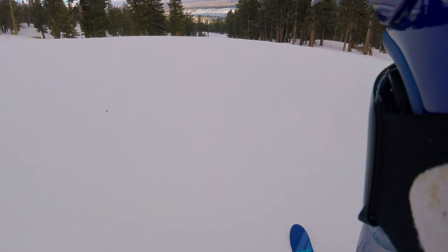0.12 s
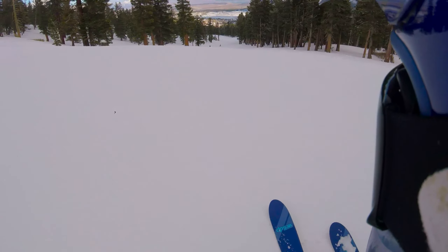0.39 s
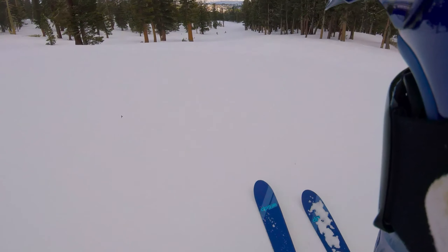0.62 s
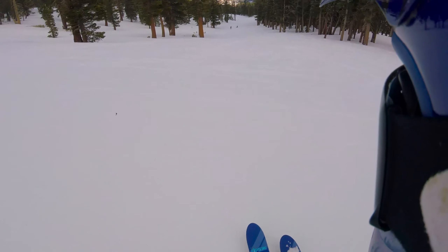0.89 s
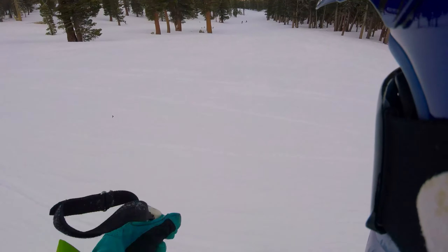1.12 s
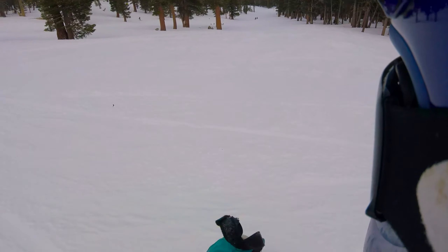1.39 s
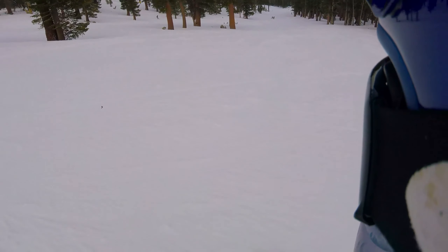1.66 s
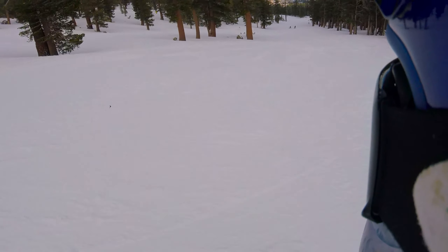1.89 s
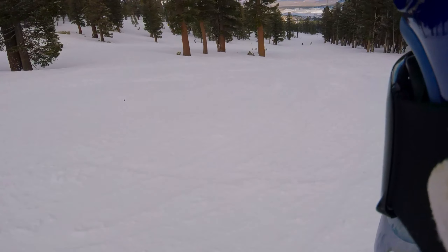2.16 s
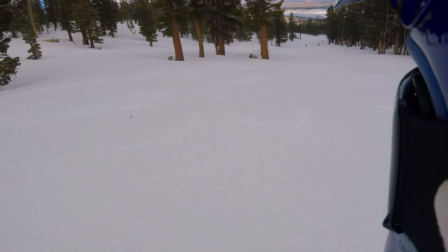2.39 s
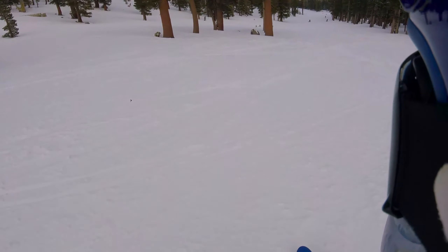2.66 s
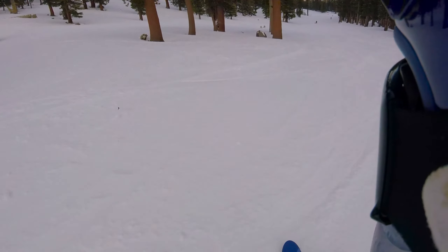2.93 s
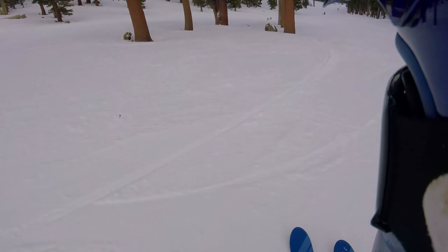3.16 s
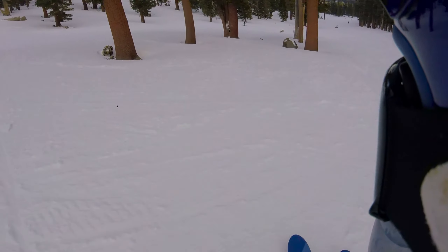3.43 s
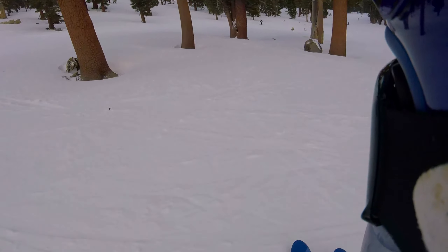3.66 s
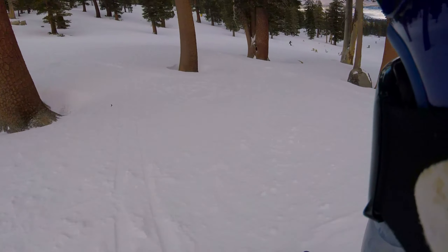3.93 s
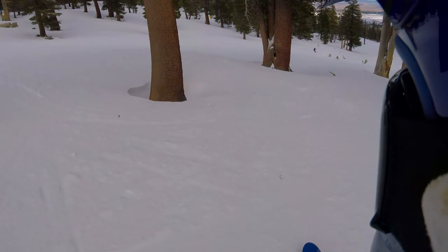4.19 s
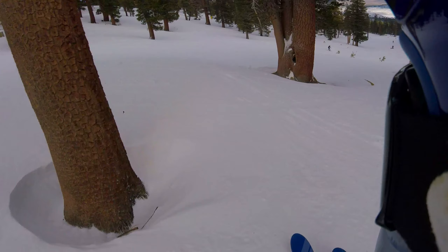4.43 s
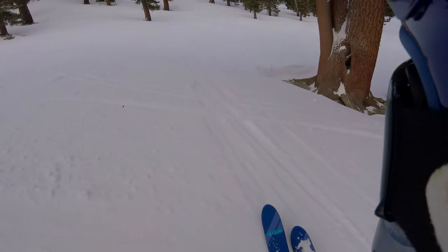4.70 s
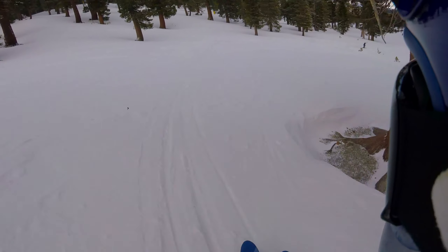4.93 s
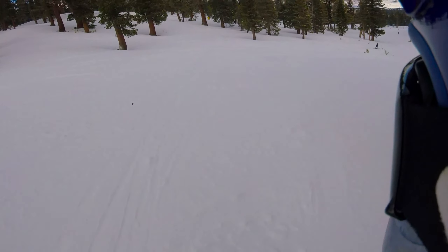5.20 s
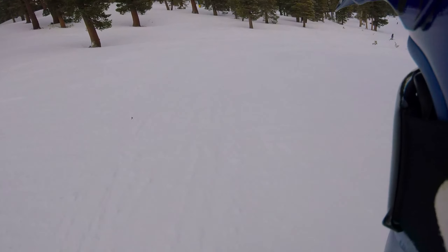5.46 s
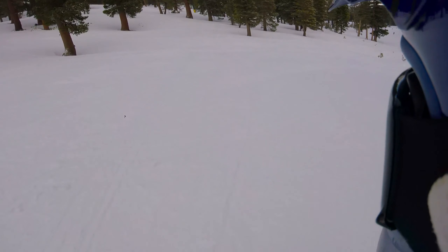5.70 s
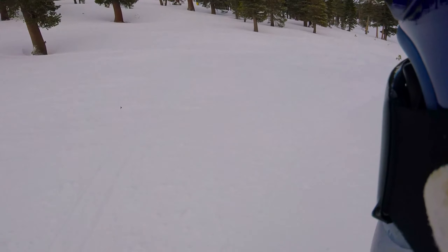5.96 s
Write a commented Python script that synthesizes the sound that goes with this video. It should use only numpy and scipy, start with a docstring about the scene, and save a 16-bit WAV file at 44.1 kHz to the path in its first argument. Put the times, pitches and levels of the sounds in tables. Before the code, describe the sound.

Throughout about six seconds, wind presses on a small helmet-mounted microphone: a dense, steady low rumble with ragged midrange flutter and airy rushing, fullest during the first two seconds. Skis grind softly through snow underneath, a grainy crunch with rapid chatter. Isolated sharp ticks land at about 1.4, 1.6 and 1.8. From 2.1 to 3.4 the rush eases, the edges bite brighter and spray hisses, with frequent snaps of crystals and a thin high airy hiss at its strongest. Around 3.5 to 3.9 low gusts flutter, and dull soft thuds join the ticks. From 4.0 to 4.4 the skis nearly quiet while crystals rattle in a quick cluster. A thud at 4.8 precedes a renewed crunch and scrape at 5.0 to 5.3; then lighter sliding, sparse ticks and a final gusty swell near 5.8 to 6. Dry, close, mono, with evened-out level and open surroundings.

```python
"""Wind is heard first: it buffets and rushes over the microphone port of a small helmet camera as a skier
glides down a powder slope. Turbulent eddies are modelled as filtered noise whose level drifts at random.
The skis crunch (sliding noise mixed with grains of breaking crust) and throw up a hissing spray.
Loose crystals tick on the housing as decaying noise bursts; softer lumps thud as a damped resonance.
Fast gain control evens the level, the bass most of all."""
import sys
import numpy as np
from scipy import signal
from scipy.fft import rfft, irfft, next_fast_len
from scipy.io import wavfile
from scipy.ndimage import uniform_filter1d

SR = 44100
rng = np.random.default_rng(int(sys.argv[2]) if len(sys.argv) > 2 else 0)


def invert_db(x):
    """Field ratio 10**(x/20) for x, a level in decibels (scalar or array-like)."""
    u = np.asarray(x, float) / 20
    return 10 ** u


def log_audio(samples):
    """Write samples as a 16-bit WAV file to the path given in sys.argv[1]."""
    # one column per channel
    frames = np.atleast_2d(samples).T
    # limit to full scale, then quantise
    limited = np.clip(frames, -1, 1)
    pcm = np.round(limited * 32767).astype(np.int16)
    wavfile.write(sys.argv[1], SR, pcm)


N = 268117


def rms_one(x):
    """Normalisation: divides a signal by its root mean square."""
    return x / np.sqrt(np.mean(x ** 2) + 1e-20)


def white():
    """White noise: independent normal samples, equal power at all frequencies, rms 1."""
    return rng.standard_normal(N)


def in_time(rows):
    """Linear interpolation of each table column along the time axis."""
    s, *columns = np.transpose(rows)
    return [np.interp(np.arange(N) / SR, s, column) for column in columns]


def colour(x, spectrum):
    """Minimum-phase filtering: a folded cepstrum gives a causal response; white noise keeps its rms."""
    size = next_fast_len(N + SR)
    hz, db = np.transpose(spectrum)
    log_hz = np.log(np.fft.rfftfreq(size, 1 / SR) + 1)
    log_gain = np.interp(log_hz, np.log(hz), db) * np.log(10) / 20
    cepstrum = irfft(log_gain, size)
    cepstrum[1:size // 2] *= 2
    cepstrum[size // 2 + 1:] = 0
    response = np.exp(rfft(cepstrum))
    response = response / np.sqrt(np.mean(abs(response) ** 2))
    return irfft(rfft(x, size) * response, size)[:N]


def drift(rate_hz):
    """Low-pass random process: noise through two equal real poles at rate_hz; mean 0, spread 1."""
    step, settle = 40, 2000    # samples per slow step; slow steps dropped while the filter settles
    r = np.exp(-2 * np.pi * rate_hz * step / SR)
    noise = rng.standard_normal(N // step + settle + 2)
    slow = signal.lfilter([1], [1, -2 * r, r * r], noise)[settle:]
    return np.interp(np.arange(N) / step, np.arange(len(slow)), rms_one(slow - slow.mean()))


def grains(per_s, spread_db):
    """Shot noise: independent random clicks of uneven size and sign, normalised to rms 1."""
    sizes = invert_db(spread_db * np.minimum(rng.exponential(1, N), 5)) * rng.choice([-1, 1], N)
    return rms_one(sizes * (rng.random(N) < per_s / SR))


def halves(x, corner_hz):
    """Band splitting: zero-phase low-pass and its complement, each at rms 1."""
    low = signal.sosfiltfilt(signal.butter(2, corner_hz, fs=SR, output="sos"), x)
    return rms_one(low), rms_one(x - low)


# pressure spectrum of the large eddies: (frequency [Hz], relative density [dB per Hz])
BUFFET_SPECTRUM = [(11, -48.5), (18, -9), (54, 1), (107, 1), (129, 0.5), (145, -7), (170, -19),
                   (220, -52.5), (370, -120)]


def wind_buffet():
    """Turbulent pressure fluctuation: large eddies thump the port, steady on average."""
    level_db = -19 + 0.5 * drift(1.3) + 0.57 * drift(9.0)
    return invert_db(level_db) * colour(white(), BUFFET_SPECTRUM)


# air over the port: (time [s], flutter of the middle eddies [dB], rush of the small eddies [dB])
WIND_LEVELS = [(0.0, -24, -33.5), (0.03, -36.5, -39), (0.08, -28, -29), (0.12, -33, -33.5),
               (0.25, -31.5, -31.5), (0.3, -18.5, -37.5), (0.36, -37, -32), (0.39, -24.5, -29),
               (0.57, -34.5, -34.5), (0.76, -30.5, -30.5), (0.85, -28, -28.5), (0.91, -34, -28.5),
               (1.0, -17, -31.5), (1.05, -31, -27), (1.1, -28, -28.5), (1.18, -28.5, -27.5),
               (1.26, -29, -29.5), (1.34, -30, -30), (1.45, -37.5, -28.5), (1.49, -23, -37.5),
               (1.57, -33, -27), (1.61, -28, -31.5), (1.66, -34, -29), (1.69, -26, -28.5),
               (1.85, -40, -32.5), (1.88, -32, -28), (1.93, -34, -34), (2.32, -27, -37), (2.34, -37, -36.5),
               (2.44, -32, -36), (3.44, -34.5, -34), (3.47, -26.5, -34.5), (3.54, -23, -35),
               (3.6, -24, -38), (3.64, -31, -32), (3.71, -24, -41.5), (3.77, -27.5, -37), (3.81, -28, -40),
               (3.84, -28.5, -35.5), (3.9, -25.5, -34.5), (3.96, -34.5, -36), (4.0, -30.5, -37),
               (4.1, -29.5, -36), (4.3, -32.5, -38), (4.52, -32, -38), (4.94, -35, -39.5),
               (4.98, -33, -32.5), (5.45, -33.5, -37), (5.72, -30.5, -33.5), (5.76, -22, -31.5),
               (5.79, -32, -34), (5.82, -30.5, -35), (5.89, -27, -32), (5.96, -25.5, -28),
               (5.99, -48, -28.5), (6.05, -30, -28.5), (6.08, -33, -37)]
# spectrum of middle and small eddies: (frequency [Hz], relative density [dB per Hz])
RUSH_SPECTRUM = [(90, -31), (140, -3.5), (175, -4.5), (260, -6), (340, -9.5), (500, -11), (700, -14),
                 (900, -18.5), (1200, -25.5), (1700, -53.5), (2500, -90)]


def wind_rush():
    """Eddy scale sets frequency: middle eddies flutter below the corner, small ones rush above it."""
    flutter_db, rush_db = in_time(WIND_LEVELS)
    eddies = white() * invert_db(1.28 * drift(52.0) + 0.56 * drift(78.0))
    flutter, rush = halves(colour(eddies, RUSH_SPECTRUM), corner_hz=322)
    flutter = invert_db(flutter_db + 0.7 * drift(5.9)) * flutter
    rush = invert_db(rush_db + 0.28 * drift(3.2)) * rush
    return flutter + rush


# thin hiss at the helmet edge, rising with speed: (time [s], level [dB])
SPEED_LEVELS = [(0, -71), (.62, -69.5), (1.2, -70.5), (1.8, -65), (2.83, -61), (3.6, -62.5), (4.2, -67.5),
                (4.77, -68.5), (5.1, -67), (5.55, -69), (6.08, -67.5)]
# spectrum of that hiss: (frequency [Hz], relative density [dB per Hz])
EDGE_HISS_SPECTRUM = [(5500, -34), (7500, -7), (8600, -6.5), (9500, -8), (10300, -11), (11300, -23.5),
                      (12000, -30.5), (13500, -32.5), (15000, -46), (22000, -110)]


def helmet_hiss():
    """Edge noise: air shed at the helmet edge gives a thin high hiss that grows with flow speed."""
    level_db, = in_time(SPEED_LEVELS)
    return invert_db(level_db + 0.4 * drift(15.0)) * colour(white(), EDGE_HISS_SPECTRUM)


def wind():
    """Superposition of the three scales of moving air."""
    return wind_buffet() + wind_rush() + helmet_hiss()


# skis in the snow: (time [s], edge bite [dB], base crunch [dB])
SKI_LEVELS = [(0.0, -42.5, -32), (0.1, -41.5, -34.5), (0.32, -45.5, -35.5), (0.41, -43.5, -31.5),
              (0.64, -48.5, -40), (0.8, -44, -32.5), (0.93, -44, -33.5), (1.05, -44, -35),
              (1.17, -45.5, -35), (1.3, -38.5, -31), (1.61, -41.5, -32.5), (1.62, -38, -30.5),
              (1.68, -41.5, -34.5), (1.79, -40.5, -33.5), (1.81, -44, -37), (2.0, -46, -38),
              (2.06, -43.5, -32), (2.12, -41, -30), (2.2, -37.5, -28), (2.23, -36.5, -36),
              (2.27, -36, -29.5), (2.35, -36.5, -35.5), (2.42, -37, -38), (2.49, -33, -39.5),
              (2.56, -41, -39), (2.79, -33, -34), (2.81, -40.5, -38), (2.89, -34, -40), (2.95, -38, -40),
              (3.3, -41, -37.5), (3.32, -37, -28), (3.35, -37.5, -40), (3.4, -36.5, -34.5),
              (3.57, -42.5, -40), (3.59, -44, -39), (3.61, -43.5, -46), (3.69, -43.5, -33),
              (3.73, -46, -44.5), (3.83, -41.5, -35), (3.84, -42, -40), (3.98, -47, -43), (4.01, -45, -36),
              (4.03, -44, -50), (4.1, -49.5, -46), (4.2, -49, -38), (4.32, -47.5, -59), (4.33, -43.5, -54),
              (4.69, -49, -47.5), (4.82, -47, -39), (4.84, -43, -31.5), (4.89, -42.5, -35),
              (4.96, -48, -36.5), (4.98, -41.5, -37), (5.04, -36.5, -30), (5.13, -37.5, -31),
              (5.19, -39, -38), (5.22, -37.5, -37), (5.27, -39, -38), (5.33, -45, -37), (5.38, -48.5, -46),
              (5.45, -47, -39), (5.59, -47.5, -38), (5.62, -42, -34), (5.69, -45, -30.5), (5.71, -49, -38),
              (5.77, -47.5, -34), (5.84, -48, -45), (5.86, -47, -34), (5.93, -46, -35.5), (6.0, -47.5, -36),
              (6.08, -50, -41)]
# spectrum of the contact, also the knock of ticks: (frequency [Hz], relative density [dB per Hz])
CRUNCH_SPECTRUM = [(400, -49), (650, -4), (850, -1), (1050, 0), (1350, -1.5), (1820, -6), (2400, -13),
                   (3130, -18.5), (4000, -26.5), (4800, -33.5), (6000, -62), (10000, -110)]


def skis():
    """Friction and fracture: smooth sliding noise plus breaking crust, chattering over the bumps."""
    edge_db, base_db = in_time(SKI_LEVELS)
    breaking = np.clip(0.38 + 0.12 * drift(6.1), 0, 1)    # crust's share of the contact power
    chatter_db = 0.91 * drift(37.0) + 0.5 * drift(80.0) + 0.11 * drift(4.7)
    crust = grains(per_s=900, spread_db=2.5)
    contact = np.sqrt(1 - breaking) * white() + np.sqrt(breaking) * crust
    base, edge = halves(colour(contact, CRUNCH_SPECTRUM), corner_hz=1620)
    crunch = invert_db(base_db + 0.52 * drift(21.0)) * base + invert_db(edge_db) * edge
    return invert_db(chatter_db) * crunch + spray(crust, breaking, chatter_db)


# spectrum of flung snow, also the ping of ticks: (frequency [Hz], relative density [dB per Hz])
SPRAY_SPECTRUM = [(2710, -46.5), (4600, -18.5), (4900, -7.5), (5780, 2.5), (6300, 3), (7390, 0),
                  (8600, -10.5), (11200, -42), (18900, -120)]


def spray(crust, breaking, chatter_db):
    """Partial correlation: airborne snow hisses with edge bite and speed, partly in step with the crust."""
    edge_db, _ = in_time(SKI_LEVELS)
    speed_db, = in_time(SPEED_LEVELS)
    by_bite = 0.62 * (edge_db - edge_db.mean())       # dB of spray per dB of bite
    by_speed = 0.26 * (speed_db - speed_db.mean())    # dB of spray per dB of speed hiss
    level_db = -52 + by_bite + by_speed
    flung = 0.15 * breaking    # share of the power that leaves in step with the breaking crust
    thrown = np.sqrt(1 - flung) * white() + np.sqrt(flung) * crust
    # airborne, so less tied to the bumps than the contact is
    return invert_db(level_db + 0.67 * chatter_db + 0.41 * drift(25.0)) * colour(thrown, SPRAY_SPECTRUM)


# crystals on the housing: (time [s], snap [dB], knock [dB], ping [dB], crack [dB])
TICK_LEVELS = [(1.398, -23, -9, -41, -36), (1.6256, -24, -16, -44, -40), (1.826, -35, -21, -44, -45),
               (2.1525, -32, -24, -44, -42), (2.1934, -14, -16, -27, -32), (2.202, -30, -15, -32, -36),
               (2.254, -37, -21, -38, -40), (2.305, -26, -19, -34, -33), (2.3725, -32, -24, -37, -33),
               (2.4844, -23, -28, -29, -40), (2.5418, -18.5, -21, -44, -42), (2.6652, -30, -16, -26, -38),
               (2.715, -29, -14, -28, -35), (2.796, -20, -25, -31, -33), (2.8888, -16, -19, -39, -34),
               (3.043, -25, -19, -37, -39), (3.1606, -31, -20, -37, -38), (3.452, -30, -13, -40, -29),
               (3.5282, -26, -27, -31, -42), (3.5824, -29, -20, -41, -42), (3.6304, -37, -26, -44, -44),
               (3.658, -28, -15, -42, -46), (3.694, -26, -18, -48, -46), (3.763, -27, -22, -39, -44),
               (3.8198, -26, -12.5, -37, -42), (3.991, -35, -17, -52, -54), (4.0098, -31, -20, -47, -47),
               (4.0416, -35, -18, -47, -48), (4.0745, -40, -24, -37, -48), (4.091, -34, -17.5, -35, -31),
               (4.1085, -32, -18, -42, -36), (4.142, -27, -28, -38, -46), (4.15, -28, -16, -40, -31),
               (4.166, -35, -18, -35, -36), (4.1853, -27, -22, -50, -31), (4.193, -34, -21, -50, -43),
               (4.202, -34, -19, -50, -44), (4.209, -37, -22, -46, -44), (4.219, -30, -16, -41, -46),
               (4.226, -34, -28, -46, -34), (4.235, -28, -27, -47, -45), (4.257, -29, -27, -44, -38),
               (4.263, -39, -22, -47, -45), (4.284, -34, -35, -47, -40), (4.292, -31, -25, -50, -50),
               (4.335, -32, -22, -49, -50), (4.3422, -29, -27, -44, -44), (4.411, -23, -18, -41, -33),
               (4.8266, -34, -24, -44, -46), (4.973, -32, -26, -42, -43), (5.0735, -24, -16, -27, -36),
               (5.114, -16.5, -17, -38, -35), (5.2075, -24, -20, -36, -35), (5.306, -29, -20, -40, -38),
               (5.5134, -37, -22, -44, -48), (5.683, -28, -23, -44, -40), (5.8635, -34, -17, -52, -45),
               (6.0028, -26, -17, -46, -47)]
# spectra of snap, crack and bright edge of a ping: (frequency [Hz], relative density [dB per Hz])
SNAP_SPECTRUM = [(1200, -38.5), (2200, 11), (3000, 0.5), (4000, -14), (4800, -23.5), (6000, -35),
                 (9000, -65.5)]
CRACK_SPECTRUM = [(1800, -29.5), (2900, -8), (3600, 5), (4600, -6.5), (5500, -14), (8000, -42),
                  (14000, -74)]
PING_TOP_SPECTRUM = [(7000, -34), (10500, -3), (12500, 1.5), (15000, -7), (17000, -37), (22000, -80)]


def ticks():
    """Impact excitation: each burst drives a dull knock, dry snap, thin crack and port-resonance ping."""
    snap_s, knock_s = 0.00035, 0.0013    # decay time constants; the knock rattles longer
    length = 256                         # samples per burst
    s, snap_db, knock_db, ping_db, crack_db = np.transpose(TICK_LEVELS)
    noise = rng.standard_normal((len(s), length))
    noise[:, 0] = 13 * np.sign(noise[:, 0])    # first contact stands above the rattle that follows
    at = np.round(s * SR).astype(int)[:, None] + np.arange(length)
    parts = [(knock_db, CRUNCH_SPECTRUM, knock_s),
             (snap_db, SNAP_SPECTRUM, snap_s),
             (crack_db, CRACK_SPECTRUM, snap_s),
             (ping_db, SPRAY_SPECTRUM, snap_s),
             (ping_db - 33, PING_TOP_SPECTRUM, snap_s)]
    out = np.zeros(N)
    for level_db, spectrum, decay_s in parts:
        burst = noise * np.exp(-np.arange(length) / (decay_s * SR))
        # equal energy for every part, whatever its decay
        burst = burst * np.sqrt(snap_s * SR / 2 / np.sum(burst ** 2, axis=1, keepdims=True))
        blows = np.zeros(N + length)
        np.add.at(blows, at, burst * invert_db(level_db)[:, None])
        out += colour(blows[:N], spectrum)
    return out


# softer lumps of snow on the housing: (time [s], height [dB])
THUD_HEIGHTS = [(3.631, -17.5), (3.768, -19.5), (3.838, -21), (3.991, -15), (4.074, -17), (4.09, -20.5),
                (4.8275, -20), (5.862, -17)]


def thuds():
    """Damped resonance: each lump sets one dull, short housing mode ringing."""
    mode_hz, t60_s = 675, 0.01
    s, height_db = np.transpose(THUD_HEIGHTS)
    clicks = np.zeros(N)
    clicks[np.round(s * SR).astype(int)] = invert_db(height_db) * rng.choice([-1, 1], len(s))
    r = invert_db(-60 / (t60_s * SR))
    w = 2 * np.pi * mode_hz / SR
    # the tiny offset keeps the decaying filter state from reaching denormal numbers
    return signal.lfilter([0, np.sin(w)], [1, -2 * r * np.cos(w), r * r], clicks + 1e-18)


# fine crystals between the loud ticks: (time [s], level [dB])
PATTER_LEVELS = [(0, -78), (2.05, -77), (2.2, -49), (2.8, -53), (3.3, -55), (3.6, -47), (3.95, -62),
                 (4.1, -46), (4.25, -48), (4.45, -53), (4.55, -75), (6.08, -72)]


def patter():
    """Shot noise through resonances: many fine crystals snap, crack, knock and ping on the housing."""
    level_db, = in_time(PATTER_LEVELS)
    fine = invert_db(level_db) * grains(per_s=260, spread_db=1.5)
    finest = invert_db(level_db) * grains(per_s=380, spread_db=2.0)
    snap = colour(fine, SNAP_SPECTRUM)
    crack = invert_db(-12.5) * colour(fine, CRACK_SPECTRUM)
    knock = invert_db(2.5) * colour(fine, CRUNCH_SPECTRUM)
    ping = invert_db(-13) * colour(finest, SPRAY_SPECTRUM)
    return snap + crack + knock + ping


def scene():
    """Superposition: the pressures of all sources add at the one microphone."""
    return (wind() + skis() + ticks() + thuds() + patter())[None]


def top_cut(x):
    """Nothing passes above the cut-off."""
    return signal.sosfilt(signal.butter(12, 15740, fs=SR, output="sos"), x)


def record(dry):
    """Dynamic compression: smoothed power sets the gain, more strongly in the bass; peaks are rounded."""
    hold_db, hold_s = -21.5, 0.015
    bass = signal.sosfiltfilt(signal.butter(2, 150, fs=SR, output="sos"), dry)
    power = uniform_filter1d(dry ** 2, int(2 * hold_s * SR), axis=1)
    over_db = 10 * np.log10(power + 1e-9) - hold_db
    over_db = uniform_filter1d(over_db, int(hold_s * SR), axis=1)
    # gain change per dB of excess: strong for the bass, slight for the rest
    held = bass * invert_db(-0.46 * over_db) + (dry - bass) * invert_db(-0.1 * over_db)
    rounded = 0.5 * np.tanh(held / 0.5)
    return top_cut(rounded)


dry = scene()
out = record(dry)
log_audio(out)
```